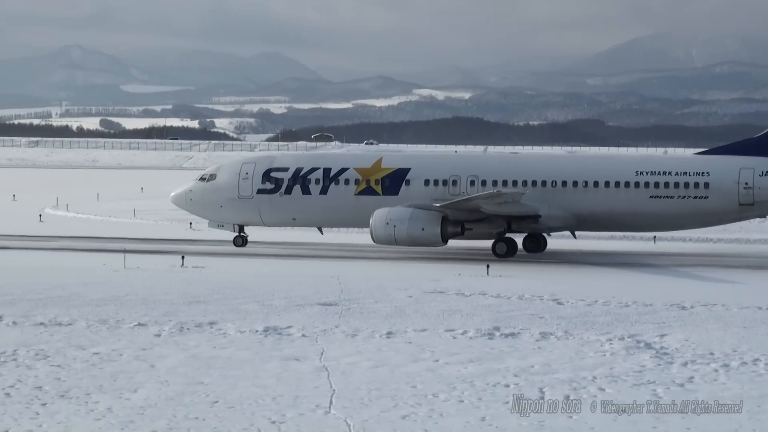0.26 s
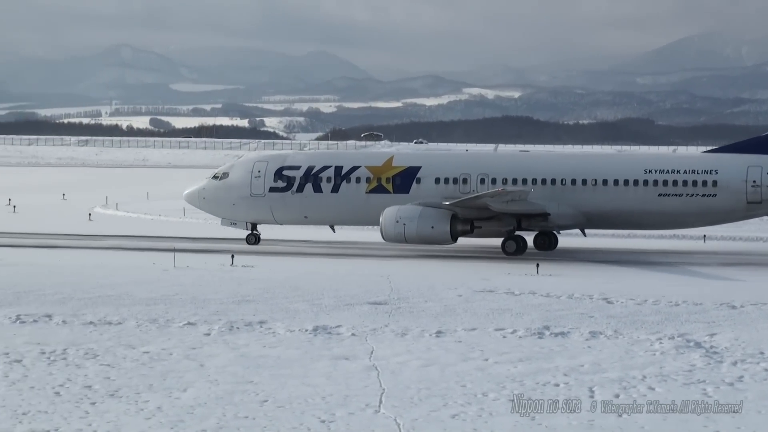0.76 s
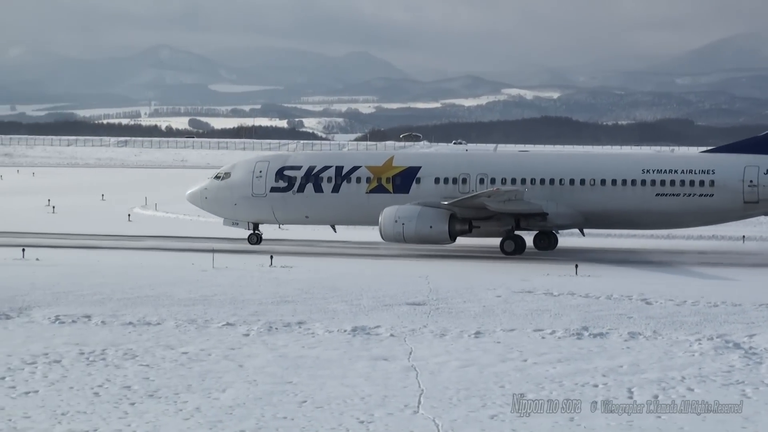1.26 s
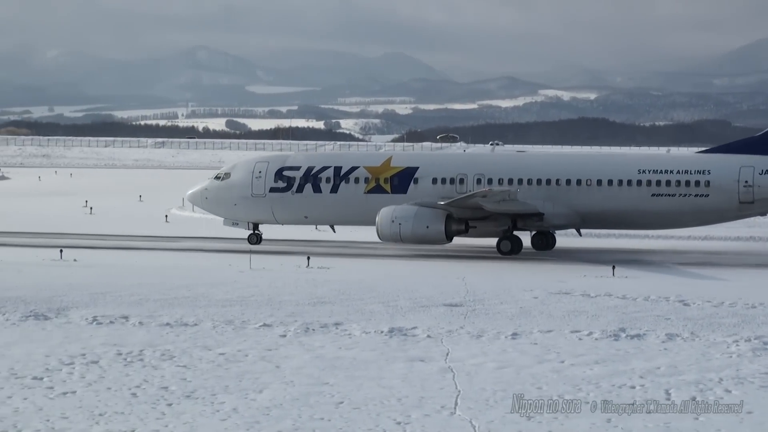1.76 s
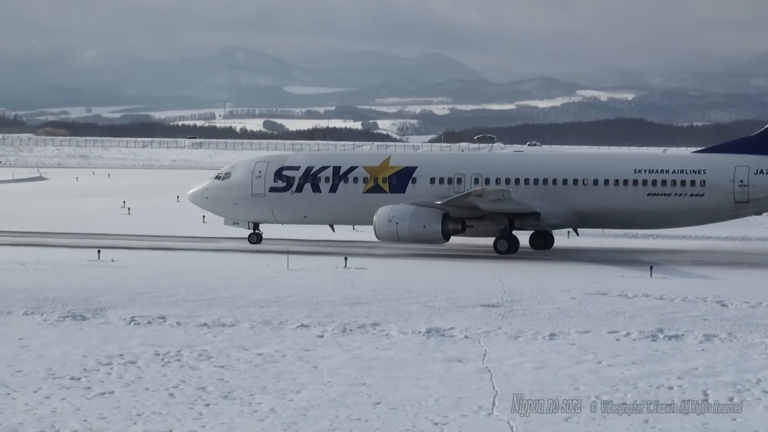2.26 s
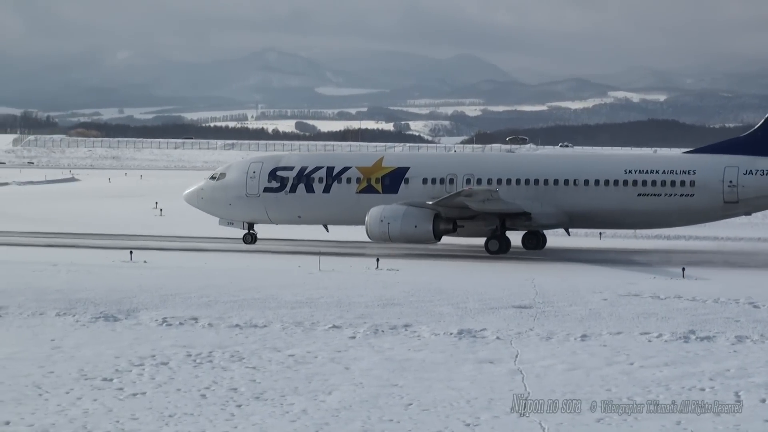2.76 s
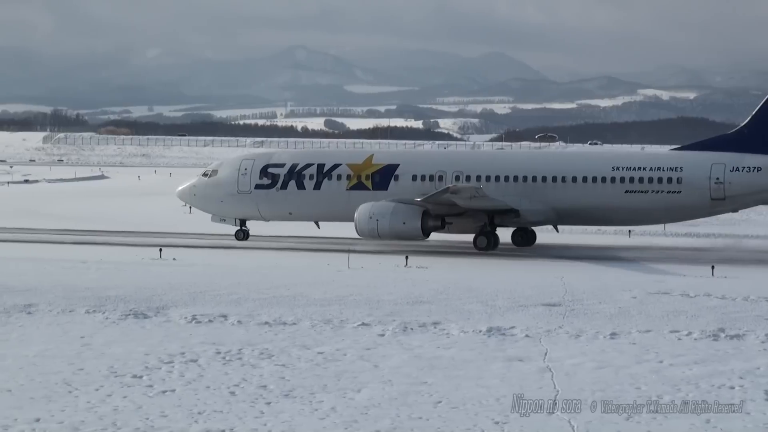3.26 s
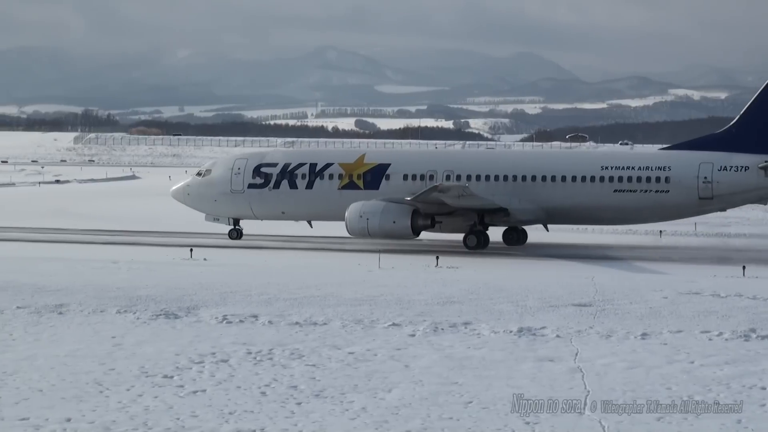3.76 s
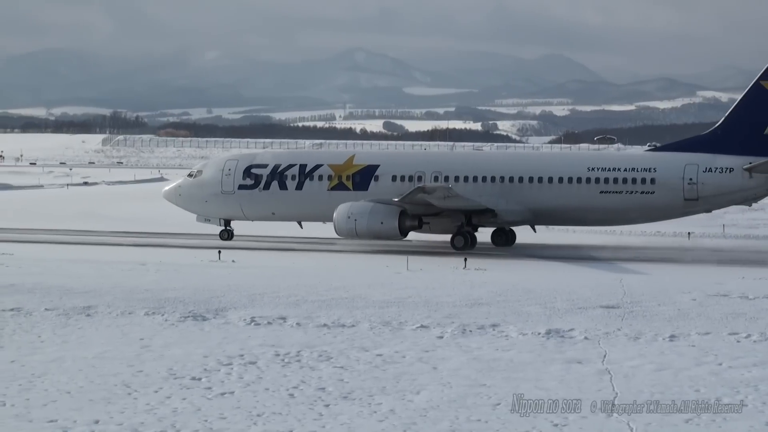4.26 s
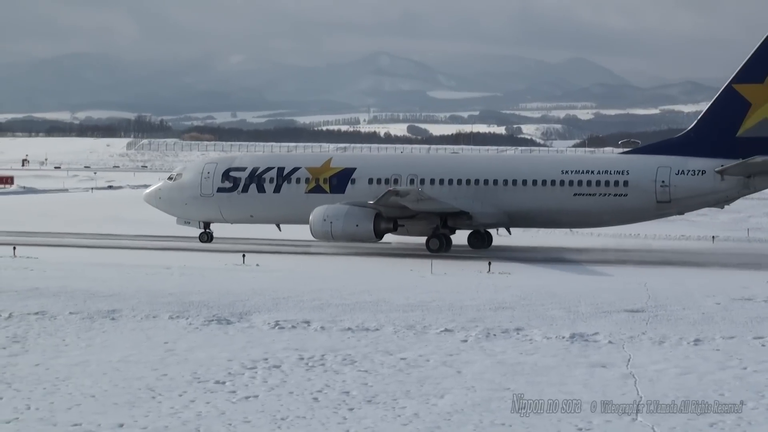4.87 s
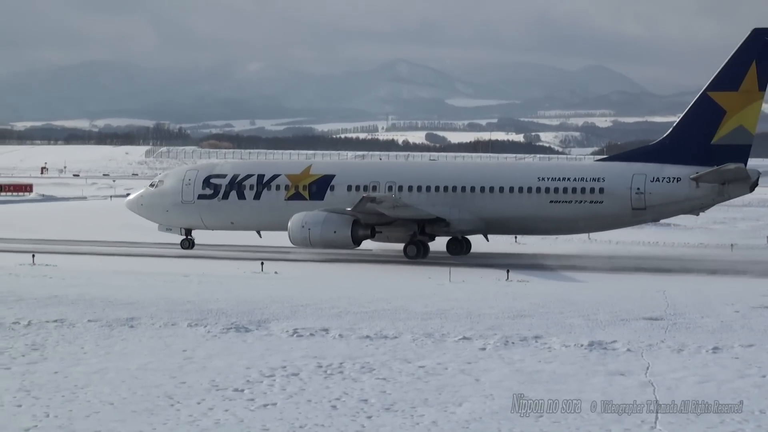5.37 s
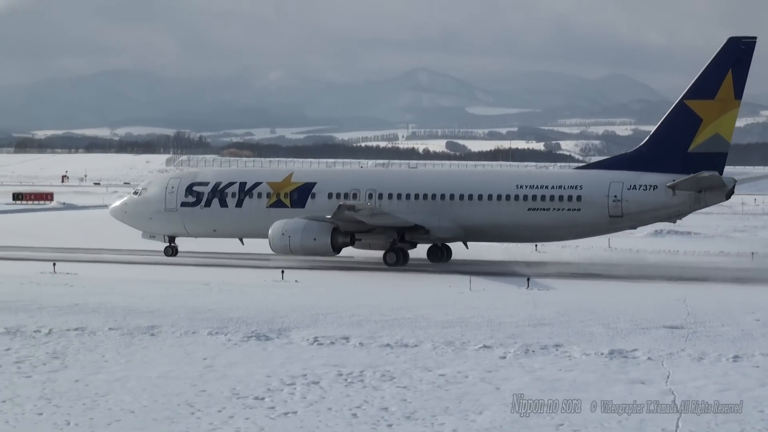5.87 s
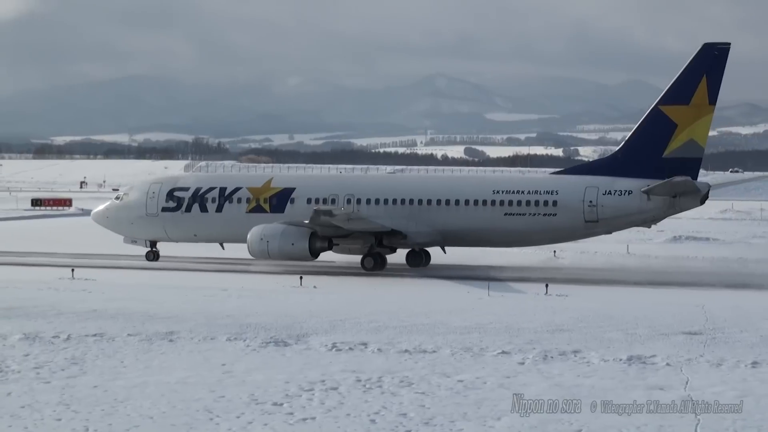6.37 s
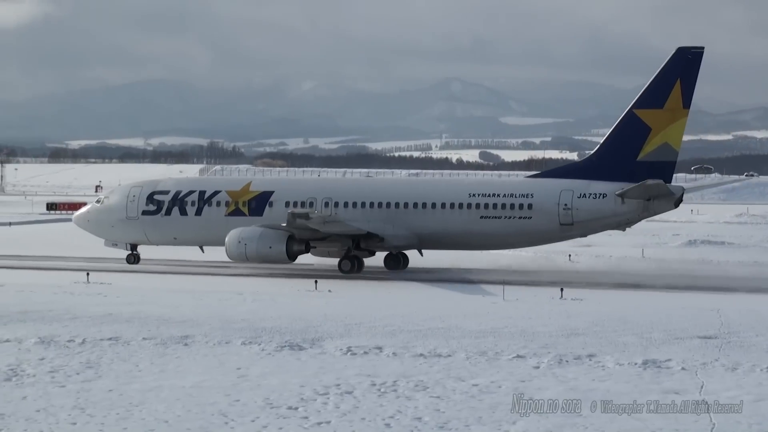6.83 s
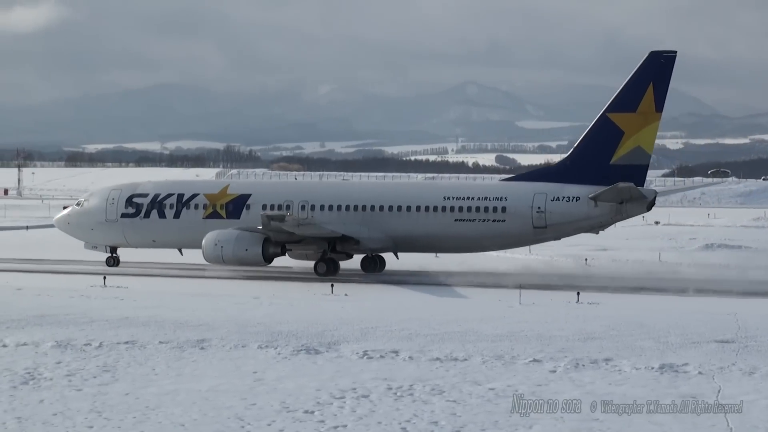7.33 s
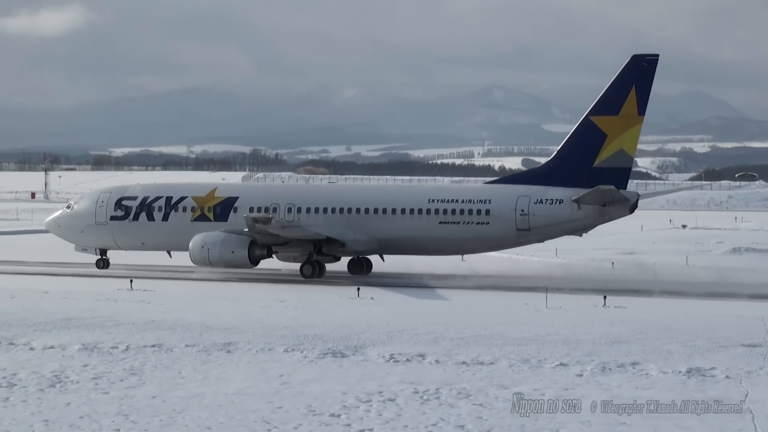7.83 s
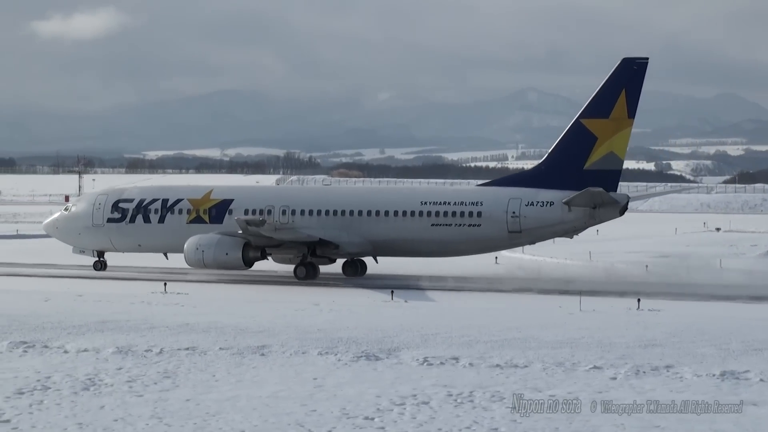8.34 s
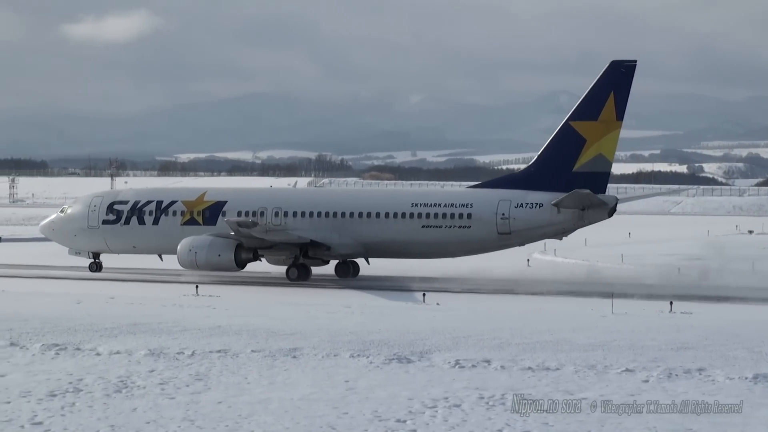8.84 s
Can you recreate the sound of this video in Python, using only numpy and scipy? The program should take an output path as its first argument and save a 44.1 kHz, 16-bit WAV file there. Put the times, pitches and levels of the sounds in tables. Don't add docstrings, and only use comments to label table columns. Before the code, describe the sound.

Twin jet engines blast continuously across open snow, mid-heavy roar and crackling hiss, with a faint piercing fan whine fluttering in and out.

```python
import sys
import numpy as np
from scipy import signal
from scipy.fft import rfft, irfft, next_fast_len
from scipy.io import wavfile
from scipy.ndimage import uniform_filter1d, minimum_filter1d

SR = 44100
rng = np.random.default_rng(int(sys.argv[2]) if len(sys.argv) > 2 else 0)


def ratio(d):
    e = np.asarray(d, float) / 20
    return 10 ** e


def digitize_waveform(pressure):
    field = np.atleast_2d(pressure).T
    bounded = np.clip(field, -1, 1)
    quanta = np.round(bounded * 32767).astype(np.int16)
    wavfile.write(sys.argv[1], SR, quanta)


N = 401310
FRAME = 1024

# f/Hz, level/dB per Hz
ROAR_SPECTRUM = [(88, -66), (150, -43.5), (209, -25), (247, -20.5), (307, -14.5), (385, -10), (466, -7),
                 (662, -5), (815, 0), (931, -1), (1100, -1.5), (1430, -10), (2420, -120)]
# f/Hz, level/dB per Hz
HISS_SPECTRUM = [(760, -32), (1300, 3.5), (1430, -1.5), (2170, -4.5), (2630, -5.5), (3530, -11),
                 (4130, -13), (4440, -12.5), (4990, -16.5), (5780, -23.5), (6620, -23), (7920, -24.5),
                 (11900, -46.5), (14700, -53), (16000, -53)]
JET_BANDS_HZ = [400, 650, 1000, 1600, 2300, 3500, 7000]
JET_SWING_DB = [-4, -1, 2, -3, -2, 0, -1.8]
# t/s, swing/0-1
AXIS_SWING = [(0, 0.2), (1.2, 0), (2.2, 0.4), (3.4, .8), (4.2, 0.83), (5.2, 0.67), (6, 0.86), (7.5, 1),
              (9.1, 1)]
# t/s, level/dB
JET_LEVEL = [(0, 1), (.5, 0), (1.2, 0), (2.0, .4), (2.8, -0.16), (3.5, 0.5), (4.1, 0), (4.8, 0), (5.6, 0),
             (6.3, 0.14), (7.0, 0), (7.8, -0.4), (8.4, 0), (9.1, -0.5)]
# t/s, f/Hz
FAN_TONE = [(0, 4419), (1.2, 4415), (2, 4401), (3.2, 4396), (4.3, 4387), (5.5, 4382), (7.2, 4377),
            (8, 4382), (9.1, 4374)]
# t/s, level/dB
MAIN_ROW = [(0, -42), (.7, -49), (1.2, -39), (1.75, -35), (1.92, -36), (2.15, -31), (2.4, -26.5),
            (2.62, -28), (2.85, -24.5), (3.15, -31), (3.35, -37.5), (4.0, -31), (4.6, -33), (5.05, -28.5),
            (6.15, -29.5), (7.1, -36), (8.2, -37.5), (9.1, -38)]
ROW_MULTIPLES = [1, .8934, .8268, 1.04, 1.0805, 1.4807]
ROW_STEADY_DB = [-56, -55, -64, -70, -72, -64]
# middle t/s, half length/s, level/dB
ROW_BEAMS = [
    [(2.95, .25, -48), (3.6, 0.32, -50), (6.15, .5, -41), (7.05, 0.66, -40.5), (8.2, .6, -45)],
    [(7.6, .8, -57)],
    [(11, 0.63, -59)],
    [(8.5, .8, -51)],
    [(5.9, .7, -54), (7.2, 0.65, -58)],
    [(2.2, 1.35, -55), (5.5, .9, -56), (7.9, .5, -56), (8.9, .4, -55)],
]
# multiple of main tone, width/Hz, level/dB
SCATTER_HUMPS = [(.987, 71, -44.5), (1.018, 130, -56), (1.003, 230, -42), (.895, 230, -40),
                 (.918, 190, -46), (.872, 200, -47), (1.77, 610, -65), (1.47, 580, -52), (2.08, 700, -64),
                 (3.33, 900, -70)]
# middle t/s, half length/s, level/dB
SCATTER_SURGES = [
    (1.3, 0.99, 6.5),
    (4.3, 0.22, 4),
    (6.8, 1.6, 2.5),
]
# middle t/s, half length/s, level/dB
AIR_POCKETS = [(0.297, 0.048, -1), (.85, 0.045, 1.5), (1.0, 0.095, 0), (1.95, .1, -1), (2.7, 0.25, -0.74),
               (3.55, 0.091, 0.5), (3.83, .08, -0.9), (4.007, .07, 1), (4.202, .08, 0.8),
               (4.552, 0.27, -0.06), (5.5, 0.075, -0.6), (5.848, 0.091, 0.65), (6.38, 0.048, 0.5),
               (6.85, .07, -0.5), (7.212, 0.12, 1), (7.395, .07, 0.5), (7.736, 0.11, -0.5),
               (7.925, 0.059, 1), (8.1, .06, -0.5), (8.58, 0.16, -0.5), (8.897, .1, 0.5)]
# f/Hz, width/Hz, level/dB
HOUSING_DIPS = [(253.4, 30, -9.5), (385, 57, -5), (172, 23, -7.5), (530, 74, -1.5), (1063, 29, -3),
                (7270, 300, -3), (8400, 430, -3), (5740, 400, 0)]
# t/s, level/dB
CEILING = [
    (0, -8.2),
    (3.6, -8.05),
    (4.1, -7.15),
    (4.7, -6.3),
    (9.1, -6.3),
]


def level(x, db):
    return x * ratio(db) / np.sqrt(np.mean(x ** 2))


def curve(table, t):
    table_t, value = np.transpose(table)
    return np.interp(t, table_t, value)


def colour_db(table, hz):
    f, db = np.transpose(table)
    return np.interp(np.log(hz + 1), np.log(f), db)


def beam(t, middle_s, half_s):
    return np.exp(-((t - middle_s) / half_s) ** 4)


def walk(shape, across, along):
    field = rng.standard_normal(shape)
    for axis, span in enumerate((across, along)):
        size = max(int(span), 1)
        field = uniform_filter1d(field, size, axis=axis)
        field = uniform_filter1d(field, size, axis=axis)
    return field / field.std()


def slow(seconds):
    step = 64
    coarse = walk((1, N // step + 2), 1, seconds * SR / step)[0]
    return np.interp(np.arange(N) / step, np.arange(len(coarse)), coarse)


def jet_level_db(hz, t):
    gain_db = curve(CEILING, t) - CEILING[0][1] + curve(JET_LEVEL, t)
    swing_db = np.interp(np.log(hz + 1), np.log(JET_BANDS_HZ), JET_SWING_DB)
    return swing_db * (curve(AXIS_SWING, t) - 0.5) + gain_db


def shimmer_db(hz, t, flicker_db):
    shape = (len(hz), len(t))
    frames_per_s = 4 * SR / FRAME
    patches_db = 0.6 * walk(shape, 4, 0.9 * frames_per_s)
    flicker = flicker_db * walk(shape, 60, 0.015 * frames_per_s)
    return patches_db + flicker * np.clip(hz / 1800, 0, 1) ** 2


def snow_db(hz, t):
    notch_hz = 1250 + 5.5 * t
    start_db, end_db, deepens_s = 0.5, -7, 4.6
    depth_db = end_db + (start_db - end_db) * np.exp(-(t / deepens_s) ** 2)
    notch_db = depth_db * np.exp(-((hz - notch_hz) / 55) ** 2)
    crest_db = 2.5 * np.exp(-((hz - 1.128 * notch_hz) / 90) ** 2)
    return notch_db + crest_db


def fringe_db(hz, t):
    centre_hz, width_hz, fades_s = 2090 + 31 * t, 85, 6.8
    return -3.5 * beam(t, 0, fades_s) * np.exp(-((hz - centre_hz) / width_hz) ** 2)


def jet_noise(gain_db):
    hz, t, z = signal.stft(rng.standard_normal(N), SR, nperseg=FRAME, noverlap=FRAME * 3 // 4)
    hz = hz[:, None]
    z = z * ratio(gain_db(hz, t) + snow_db(hz, t))
    return signal.istft(z, SR, nperseg=FRAME, noverlap=FRAME * 3 // 4)[1][:N]


def roar():
    def gain_db(hz, t):
        start_hz, end_hz, rise_s, order = 1045, 1192, 3, 10.3
        edge_hz = end_hz - (end_hz - start_hz) * np.exp(-t / rise_s)
        edge_db = -10 * np.log10(1 + (hz / edge_hz) ** (2 * order))
        return colour_db(ROAR_SPECTRUM, hz) + edge_db + jet_level_db(hz, t) + shimmer_db(hz, t, 0.36)
    return level(jet_noise(gain_db), -15.5)


def hiss():
    def gain_db(hz, t):
        low_cut_db = -10 * np.log10(1 + (1150 / (hz + 1)) ** 8)
        air_db = fringe_db(hz, t) + shimmer_db(hz, t, 0.76)
        return colour_db(HISS_SPECTRUM, hz) + low_cut_db + jet_level_db(hz, t) + air_db
    return level(jet_noise(gain_db), -23.5)


def blade_rows(t, fan_phase, pockets_db):
    core_hz = 7000 - 3.6 * t - 5.2 * np.maximum(t - 6.5, 0) ** 2
    phases = [multiple * fan_phase for multiple in ROW_MULTIPLES]
    phases.append(2 * np.pi * np.cumsum(core_hz) / SR)
    gains = [ratio(curve(MAIN_ROW, t))]
    for steady_db, beams in zip(ROW_STEADY_DB, ROW_BEAMS):
        sweeps = sum(ratio(db) * beam(t, middle_s, half_s) for middle_s, half_s, db in beams)
        gains.append(ratio(steady_db) + sweeps)
    twinkles_db = [0.4] + [1.6] * len(ROW_BEAMS)
    tones = 0
    for phase, gain, twinkle_db in zip(phases, gains, twinkles_db):
        flutter_db = 3 * pockets_db + 0.5 * slow(0.035) + twinkle_db * slow(0.09)
        wander_rad = 0.44 * slow(0.067)
        tones = tones + np.sqrt(2) * gain * ratio(flutter_db) * np.sin(phase + wander_rad)
    return tones


def scatter(t, fan_phase, pockets_db):
    surge_db = sum(db * beam(t, middle_s, half_s) for middle_s, half_s, db in SCATTER_SURGES)
    thinning_db = -3 * (1 - beam(t, 0, 8.4))
    humps = 0
    for multiple, width_hz, db in SCATTER_HUMPS:
        sidebands = walk((2, N), 1, 0.6 * SR / width_hz)
        near_main = 0.95 < multiple < 1.1
        near_lower = multiple < 0.95
        local_db = near_main * surge_db + near_lower * thinning_db
        swell = ratio(db + local_db + pockets_db + 0.6 * slow(0.2))
        phase = multiple * fan_phase
        humps = humps + swell * (sidebands[0] * np.sin(phase) + sidebands[1] * np.cos(phase))
    return humps


def whine(pockets_db):
    t = np.arange(N) / SR
    fan_phase = 2 * np.pi * np.cumsum(curve(FAN_TONE, t)) / SR
    return blade_rows(t, fan_phase, pockets_db) + scatter(t, fan_phase, pockets_db)


def scene():
    t = np.arange(N) / SR
    gusts = ratio(0.92 * slow(0.008) + 0.45 * slow(0.032))
    pockets_db = sum(db * beam(t, middle_s, half_s) for middle_s, half_s, db in AIR_POCKETS)
    short_waves = ratio(pockets_db) * hiss() + whine(pockets_db)
    return (roar() + gusts * short_waves)[None]


def housing(x):
    size = next_fast_len(N)
    hz = np.arange(size // 2 + 1) * SR / size
    dips_db = sum(db / (1 + (2 * (hz - f) / width) ** 2) for f, width, db in HOUSING_DIPS)
    return irfft(rfft(x, size) * ratio(dips_db), size)[:N]


def duck(x, share, window_s):
    power = uniform_filter1d(x ** 2, int(window_s * SR))
    usual = uniform_filter1d(power, SR // 2)
    return x * ((power + 1e-9) / usual) ** (-share / 2)


def squeeze(x, top, hold_s):
    size = 2 * int(hold_s * SR) + 1
    need = np.minimum(1, top / (np.abs(x) + 1e-9))
    held = minimum_filter1d(need, size=2 * size - 1)
    return x * uniform_filter1d(uniform_filter1d(held, size), size)


def buffeting():
    gusty = rng.standard_normal(N) * ratio(3.7 * slow(0.012) + 3.4 * slow(0.18))
    return level(signal.sosfilt(signal.butter(2, 200, fs=SR, output="sos"), gusty), -65)


def low_pass(x):
    return signal.sosfilt(signal.butter(12, 16340, fs=SR, output="sos"), x)


def record(dry):
    wind_cut = signal.butter(4, 120, "high", fs=SR, output="sos")
    cut = signal.sosfilt(wind_cut, housing(dry[0]))
    top = ratio(curve(CEILING, np.arange(N) / SR) + 0.17 * slow(0.003))
    ridden = duck(cut, share=0.09, window_s=0.012)
    mix = squeeze(ridden, top, hold_s=0.00029) + buffeting()
    top_cut = signal.ellip(10, 0.1, 60, 15740, fs=SR, output="sos")
    mix = signal.sosfiltfilt(top_cut, mix)
    return low_pass(mix[None])


dry = scene()
out = record(dry)
digitize_waveform(out)
```